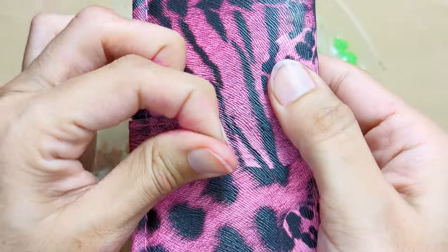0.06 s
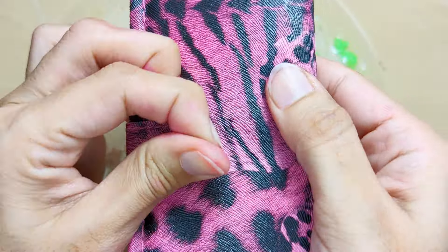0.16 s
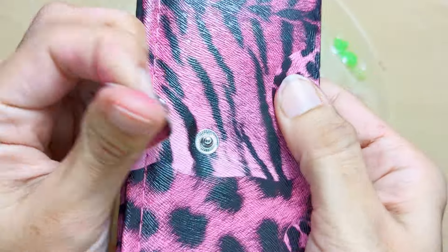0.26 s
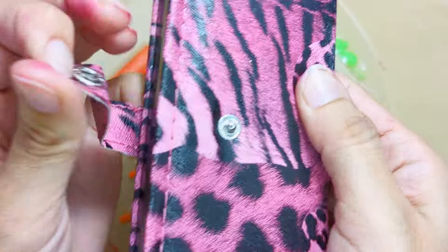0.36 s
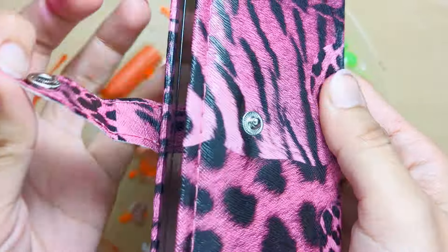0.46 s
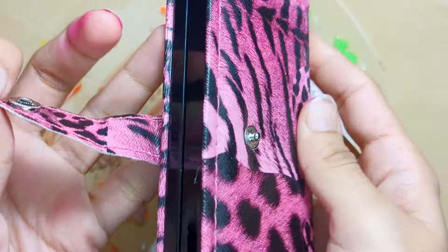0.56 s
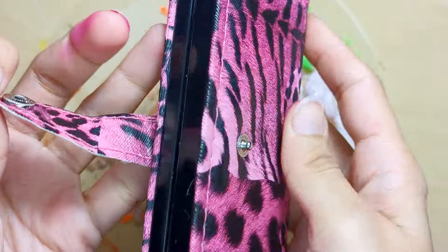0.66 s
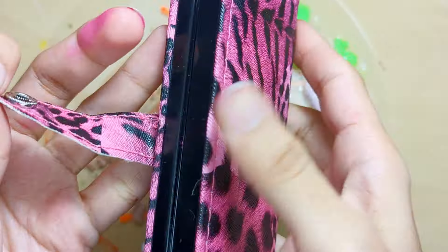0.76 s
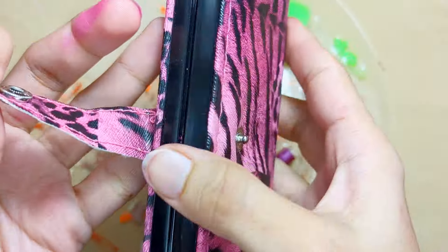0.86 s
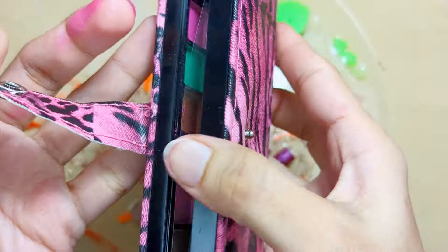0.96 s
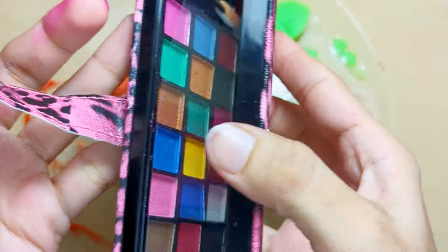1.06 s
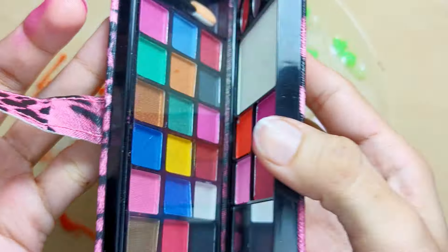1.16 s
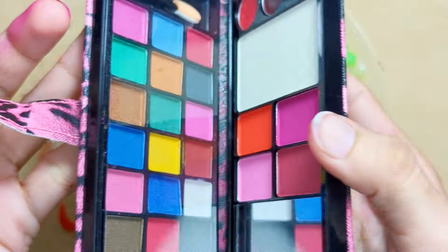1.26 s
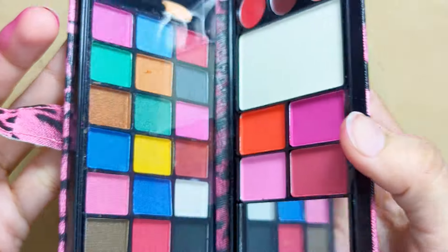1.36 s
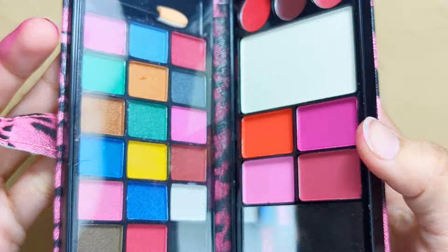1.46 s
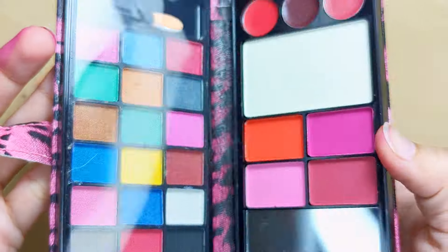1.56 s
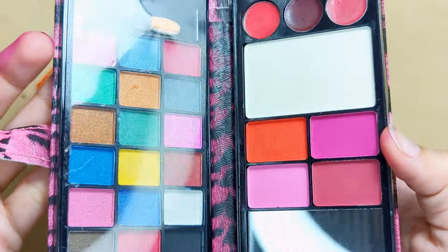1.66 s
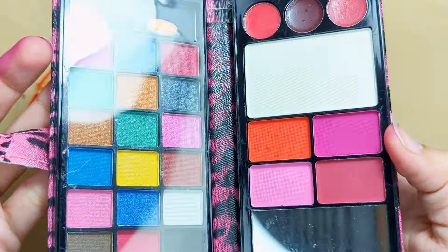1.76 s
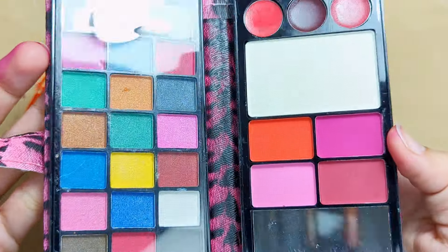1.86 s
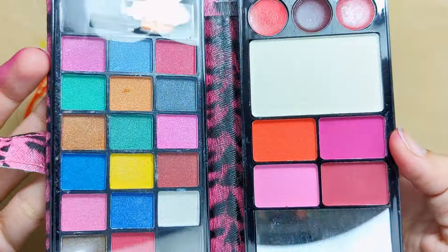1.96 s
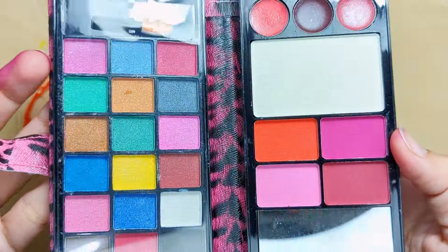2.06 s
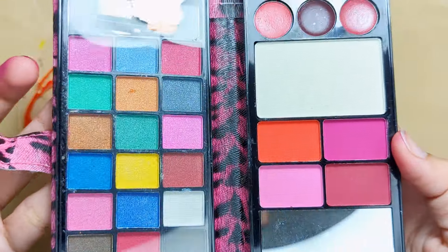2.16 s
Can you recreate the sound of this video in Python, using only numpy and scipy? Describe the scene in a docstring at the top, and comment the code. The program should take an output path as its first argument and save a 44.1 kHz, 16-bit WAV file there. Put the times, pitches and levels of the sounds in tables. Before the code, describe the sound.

A metal snap fastener on a padded makeup case pops open at about 0.2 seconds, loud and abrupt, with a short hollow flutter. Finger rubs and small ticks follow until 0.7. After a lull, light plastic clicks gather from 0.95, with a crisp bright click near 1.17, then sparse taps and rubs until 1.6. Near quiet follows, over very faint low hum and room air, heard close in a small room.

```python
"""Indoors, close to a phone: a metal snap on the strap of a plastic makeup case pops open.
Slips of the stud ring the padded cover with a metal crack; softer shudders ring its low modes.
Fingers slide on the cover (dense grains); metal stud and plastic case parts tick (rung modes).
Under it: a wavering mains hum (sine), low rumble and room air (shaped noise)."""
import sys
import numpy as np
from scipy import signal
from scipy.fft import rfft, irfft, next_fast_len
from scipy.io import wavfile
from scipy.ndimage import uniform_filter1d, map_coordinates

SR = 44100
rng = np.random.default_rng(int(sys.argv[2]) if len(sys.argv) > 2 else 0)


def gain_from_db(level_db):
    """Convert decibel levels to linear amplitude factors (20 dB per decade)."""
    decades = np.asarray(level_db, float) / 20
    return 10 ** decades


def store_pcm(level_fs):
    """Save levels as 16-bit WAV."""
    pcm = np.round(np.clip(level_fs, -1, 1) * 32767).astype(np.int16)
    wavfile.write(sys.argv[1], SR, np.atleast_2d(pcm).T)


N = 97020


def unit(x):
    """Scale to rms 1."""
    return x / np.sqrt(np.mean(x ** 2) + 1e-20)


def along(points, hz):
    """Interpolate (Hz, value) points on a log-frequency axis."""
    point_hz, value = np.transpose(points)
    return np.interp(np.log(hz + 1), np.log(point_hz + 1), value)


def wobble(knots_per_s):
    """Smooth random curve through normal-distributed knots."""
    knots = rng.standard_normal(int(N * knots_per_s / SR) + 4)
    return map_coordinates(knots, [np.arange(N) * knots_per_s / SR])


def filtered(x, response):
    """Multiply the spectrum of x by a (complex) response of frequency."""
    m = next_fast_len(N + SR // 2)
    return irfft(rfft(x, m) * response(np.fft.rfftfreq(m, 1 / SR)), m)[..., :N]


def add(track, start_s, sound):
    """Mix a sound into a track at a time."""
    part = track[..., round(start_s * SR):][..., :sound.shape[-1]]
    part += sound[..., :part.shape[-1]]


def rush(spectrum, patchy_db):
    """Stereo noise of rms 1: random gain patches in time and frequency, left-right likeness by band."""
    # left-right correlation: freq_hz, likeness (0..1)
    likeness = [(60, 0.72), (240, 0.32), (950, 0.2), (3770, 0.07), (15000, 0.04)]
    z = signal.stft(rng.standard_normal((2, N)), nperseg=512)[2]
    field = uniform_filter1d(rng.standard_normal(z.shape[1:]), 6, 0)
    field = uniform_filter1d(field, 14, 1)
    pair = signal.istft(z * gain_from_db(patchy_db * unit(field)), nperseg=512)[1][:, :N]

    def mid_side_gain(hz):
        angle = np.arccos(np.clip(along(likeness, hz), -1, 1)) / 2
        return gain_from_db(along(spectrum, hz)) * np.array([np.cos(angle), np.sin(angle)])

    mid, side = filtered(pair, mid_side_gain)
    return unit(np.array([mid + side, mid - side]))


def hum():
    """Mains hum: one sine, wavering in level and phase."""
    hum_hz, rms_db, waver_db, drift_rad = 99.8, -55.5, 2, .5
    level = np.sqrt(2) * gain_from_db(rms_db + waver_db * wobble(9))
    return level * np.sin(2 * np.pi * hum_hz * np.arange(N) / SR + drift_rad * wobble(8))


def rumble():
    """Low noise, slowly varying in level."""
    # rumble spectrum: freq_hz, relative_level_db
    spectrum = [(15, -51), (27, -24), (40, -8), (60, 1.5), (90, -5), (125, -25), (200, -100)]
    level_db, waver_db = -59.5, 1.2
    return gain_from_db(level_db + waver_db * wobble(5.6)) * rush(spectrum, patchy_db=2.0)


def air():
    """Room air: broad noise falling with frequency, slowly varying in level."""
    # air spectrum: freq_hz, relative_level_db
    spectrum = [(90, -30), (130, -1.5), (200, -3), (400, -2.5), (700, -9.5), (1000, -18.5), (1500, -23.5),
                (2600, -24), (4000, -33.5), (7000, -40.5), (16000, -52.5)]
    level_db, waver_db = -59, .8
    return gain_from_db(level_db + waver_db * wobble(3.9)) * rush(spectrum, patchy_db=1.5)


def slides():
    """Skin catches on the cover's grain: dense tiny grains under each stroke, dull or bright."""
    # finger strokes: start_s, length_s, level_db, treble_share (of power, 0..1)
    strokes = [(0, .11, -64, .04), (.215, .09, -48.5, 0.36), (.295, .05, -52.5, 0.575),
               (.335, .055, -54, .7), (.44, .08, -58, .15), (.53, 0.074, -57.5, 0.15),
               (.56, .105, -57, 0.43), (.67, .06, -72, 0.97), (.915, .045, -63, .015),
               (.975, .08, -65, .03), (1.055, .075, -52, .5), (1.115, .065, -55, 0.3),
               (1.155, .11, -59, 0.59), (1.275, 0.0334, -72, .9), (1.31, .06, -59, .5),
               (1.382, .045, -64, .12), (1.42, .08, -72, .03), (1.497, .036, -59, .3),
               (1.545, .04, -59, 0.75), (1.865, .07, -65, .015)]
    # dull grain spectrum: freq_hz, relative_level_db
    dull_spectrum = [(400, -31), (800, -6), (1400, 0), (2600, -1.5), (4500, -10), (8000, -24), (16000, -48)]
    # bright grain spectrum: freq_hz, relative_level_db
    bright_spectrum = [(2000, -14), (3000, -3), (4500, -6), (6600, 0), (8200, -6), (9500, -3), (12000, -10),
                       (16000, -22)]
    rise = .4  # share of the stroke spent rising
    grains_per_s, grain_db, catch_db = 9000, 2, 2.2
    alike = .6  # power share common to left and right

    t, dull, bright = np.arange(N) / SR, np.zeros(N), np.zeros(N)
    for start_s, length_s, db, treble in strokes:
        u = np.clip((t - start_s) / length_s, 0, 1)
        stroke = gain_from_db(db) * np.sin(np.pi / 2 * np.minimum(u / rise, (1 - u) / (1 - rise))) ** 2
        dull += stroke * np.sqrt(1 - treble)
        bright += stroke * np.sqrt(treble)

    def sparse(*shape):
        return (rng.random(shape) < grains_per_s / SR) * rng.standard_normal(shape)

    def grains(spectrum):
        pair = np.sqrt(alike) * sparse(N) + np.sqrt(1 - alike) * sparse(2, N)
        pair = pair * gain_from_db(grain_db * wobble(220) + catch_db * wobble(60))
        return unit(filtered(pair, lambda hz: gain_from_db(along(spectrum, hz))))

    return dull * grains(dull_spectrum) + bright * grains(bright_spectrum)


def early():
    """The quick answer of hands and table, different at each port: decaying noise."""
    t60_s = .013
    t = np.arange(SR // 20) / SR
    tail = rng.standard_normal((2, len(t))) * gain_from_db(-60 * t / t60_s)
    return tail / np.linalg.norm(tail[0])


def ticks():
    """Each tick is a brief scrape that rings case and stud modes, heard around its own pitch."""
    # case and stud modes: nominal_hz, nominal_level_db, t60_s
    modes = [(700, -1, 0.015), (1371.6, 1, 0.012), (1743, -1.5, 0.012), (2349, -3.5, .008),
             (2846, 2.5, 0.0088), (3500, -2.5, 0.0072), (4390, 0.5, 0.0047), (5100, -6.5, 0.0034),
             (6282, -3.5, 0.0078), (7096, -1, .007), (8690, -4, 0.0061), (9600, 0, 0.0074),
             (11500, -5.5, .004), (13470, -6, .003)]
    # ticks: start_s, peak_db (of the left-right mean), centre_hz, spread_octaves, scrape_s
    tick_list = [(.270, -33, 3080, 1.8, 0.002), (.3155, -36, 5500, .8, 0.0017), (.357, -42, 6300, .7, .003),
                 (.472, -48, 1500, .5, 0.0023), (.5594, -53, 2590, 0.4, .001),
                 (.9374, -55, 1680, .6, 0.0019), (.9853, -45, 1500, .7, 0.0015),
                 (1.0605, -47, 1720, .7, 0.0019), (1.0824, -36, 4500, 1.4, .0012),
                 (1.1054, -37, 4000, 1.5, 0.0011), (1.1314, -47, 4000, 1.3, 0.0013),
                 (1.1388, -44, 4500, 1.3, .001), (1.1746, -17, 7400, .4, .0004),
                 (1.1793, -29, 6740, 0.38, 0.0009), (1.2894, -62, 9500, .4, 0.0023),
                 (1.3275, -41, 5006, 0.75, 0.00084), (1.3392, -52, 4540, 1.1, 0.0013),
                 (1.3974, -50, 2840, 0.87, .0018), (1.5075, -46, 3500, 0.63, .0012),
                 (1.5154, -50, 5960, 1.46, 0.0017), (1.5564, -43, 5900, 1.57, .0008),
                 (1.5605, -46, 3000, 1.4, .0012), (1.9768, -68, 8110, 0.71, 0.00098),
                 (2.0694, -68, 8010, 1, 0.0024)]
    flex, mode_scatter_db = 0.031, 1.4  # flex: relative scatter of mode pitch
    dry_db = -2  # unrung scrape, relative to the mean modal response
    broad_db = -20  # what every tick has outside its own pitch
    lag_scatter_s = .00004  # between the ports, drawn at random for each tick
    early_db = -9

    out, t = np.zeros((2, N)), np.arange(SR // 20) / SR
    size = 2 * len(t)
    f = np.fft.rfftfreq(size, 1 / SR) + 1
    lead = 64  # samples of room for the port that leads
    for start_s, peak_db, centre_hz, octaves, scrape_s in tick_list:
        ring = np.zeros(len(t))
        for mode_hz, level_db, t60_s in modes:
            decay = gain_from_db(level_db + rng.normal(0, mode_scatter_db) - 60 * t / t60_s)
            ring += decay * np.sin(2 * np.pi * mode_hz * (1 + flex * rng.normal()) * t)
        body = rfft(ring, size)
        body = body + gain_from_db(dry_db) * np.abs(body).mean()
        u = t / scrape_s
        scrape = rfft(rng.standard_normal(len(t)) * u * np.exp(-u), size)
        near = np.exp(-.5 * (np.log2(f / centre_hz) / octaves) ** 2)
        near += gain_from_db(broad_db) * f / (f + 600)
        lag_s = lag_scatter_s * rng.normal() * np.array([[1], [-1]])
        ports = np.exp(1j * np.pi * f * lag_s) + gain_from_db(early_db) * rfft(early(), size)
        tick = np.roll(irfft(ports * scrape * near * body), lead, axis=1)
        add(out, start_s - lead / SR, gain_from_db(peak_db) * tick / np.abs(tick.mean(axis=0)).max())
    return out


def snap():
    """Sharp slips ring the whole cover with a metal crack; the later shudders ring only its low modes."""
    # stud tearing out of its spring: start_s, push (signed, relative)
    slips = [(.2119, 0.021), (.2145, -.3), (.2154, .7), (.2162, -.9), (.2168, 1.2), (.2175, .6)]
    # strap and cover shuddering on: start_s, level_db
    shudders = [(.2245, -22), (.230, -26), (.2372, -28), (.2475, -25), (.2555, -26), (.2625, -34),
                (.275, -36), (.294, -39), (.312, -41)]
    # padded cover modes: mode_hz, relative_level_db, t60_s
    cover = [(435, -4, .028), (520, -9, 0.025), (659, -6, .022), (1100, -10, .012), (1290, -1, .022),
             (1480, -6, .016), (1650, -4, .018), (2300, -16, .012), (2890, -7, .016), (4000, -14, .01)]
    ring_db, crack_db, crack_t60_s = -4, -15, .013
    soft_hz, soft_s = 700, .0012  # shudder: top of the modes rung, onset time
    flap_hz, flap_db, flap_t60_s = 600, 3, .055  # flap level relative to its shudder
    low_cut_hz = 390

    out, t = np.zeros(N), np.arange(SR // 8) / SR

    def ring(top_hz):
        total = np.zeros(len(t))
        for mode_hz, db, t60_s in cover:
            level = gain_from_db(db - 60 * t / t60_s) / (1 + (mode_hz / top_hz) ** 6)
            total += level * np.sin(2 * np.pi * mode_hz * t)
        return total

    for start_s, push in slips:
        # band-passed noise: no energy at 0 Hz or SR / 2
        noise = signal.lfilter([1, 2, 0, -2, -1], 4, rng.standard_normal(len(t)))
        crack = gain_from_db(crack_db - 60 * t / crack_t60_s) * noise
        add(out, start_s, push * (gain_from_db(ring_db) * ring(SR) + crack))
    flap = gain_from_db(flap_db - 60 * t / flap_t60_s) * np.sin(2 * np.pi * flap_hz * t)
    onset = 1 - np.exp(-t / soft_s)
    for start_s, db in shudders:
        add(out, start_s, gain_from_db(db) * onset * (ring(soft_hz) + flap))
    return signal.sosfilt(signal.butter(3, low_cut_hz, "high", fs=SR, output="sos"), out)


def room(x):
    """Wall reverberation: a stereo noise tail whose decay time depends on frequency."""
    # wall decay: freq_hz, t60_s
    walls = [(200, 0.54), (700, .25), (2000, 0.24), (10000, .1)]
    room_db, delay = -26, 400  # delay in samples
    hz, t, z = signal.stft(rng.standard_normal((2, SR // 2)), SR, nperseg=256)
    decay = gain_from_db(-60 * t / along(walls, hz)[:, None])
    tail = signal.istft(z * decay, SR, nperseg=256)[1]
    tail = tail / np.linalg.norm(tail[0])
    delayed = np.pad(x, (delay, 0))[None]
    return gain_from_db(room_db) * signal.fftconvolve(delayed, tail, axes=1)[:, :N]


def scene():
    """Sum the layers at two ports; the snap sits a little nearer the left one."""
    right_lag_s, early_db = .00012, -19
    pop, handling = snap(), ticks() + slides()
    half_lag_s = right_lag_s / 2 * np.array([[1], [-1]])
    ports = filtered(pop, lambda hz: np.exp(2j * np.pi * hz * half_lag_s))
    ports = ports + gain_from_db(early_db) * signal.fftconvolve(pop[None], early(), axes=1)[:, :N]
    background = hum() + rumble() + air()
    return ports + handling + room(pop + handling.mean(axis=0)) + background


def band_limit(x):
    """A steep low-pass at the top of the band."""
    return signal.sosfilt(signal.butter(12, 16240, fs=SR, output="sos"), x)


def record(dry):
    """The microphone dulls the top; the input clips softly on loud peaks."""
    mic_hz, top, knee = 14500, 1.0, 8  # top: clip level at full scale 1; knee: higher is harder
    heard = filtered(dry, lambda hz: 1 / (1 + (hz / mic_hz) ** 6) ** .5)
    clipped = heard / (1 + np.abs(heard / top) ** knee) ** (1 / knee)
    return band_limit(clipped)


dry = scene()
out = record(dry)
store_pcm(out)
```